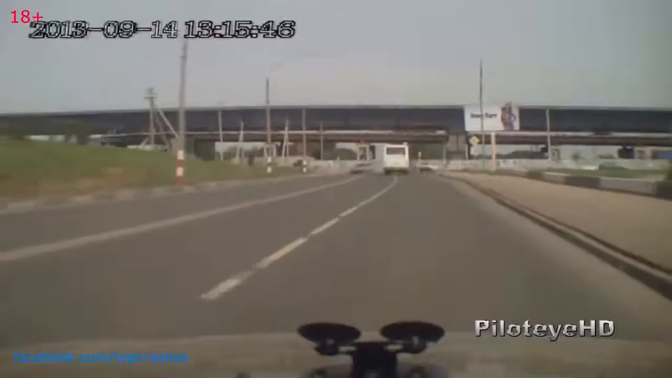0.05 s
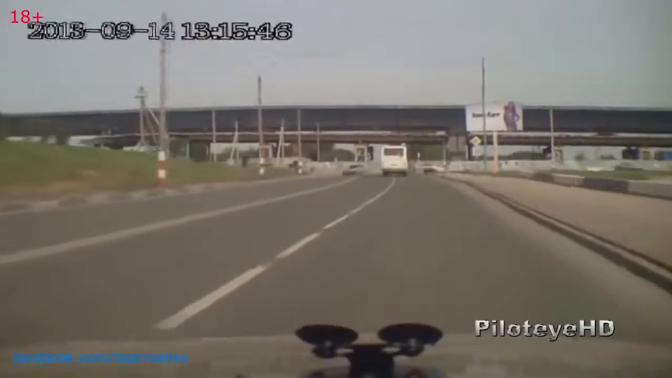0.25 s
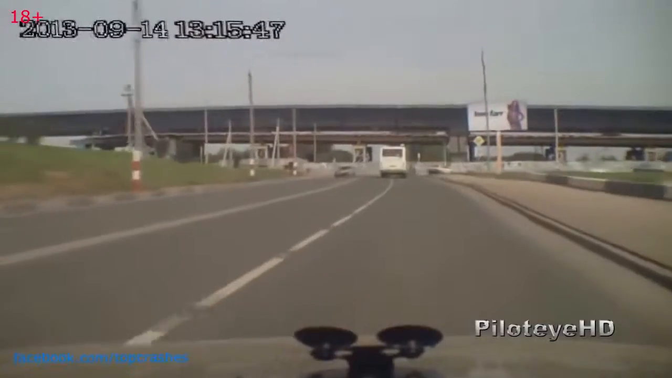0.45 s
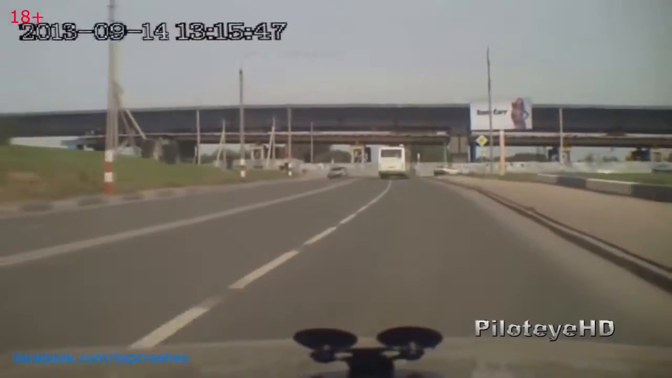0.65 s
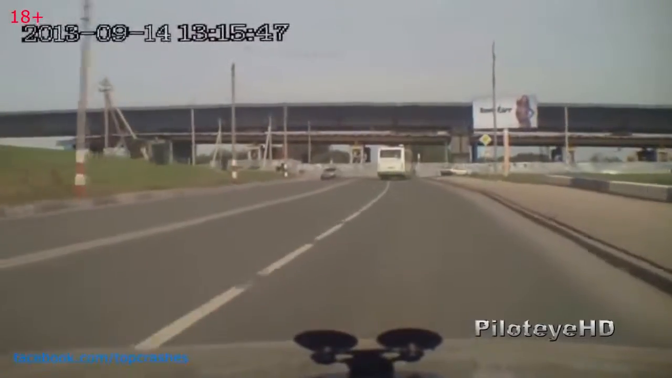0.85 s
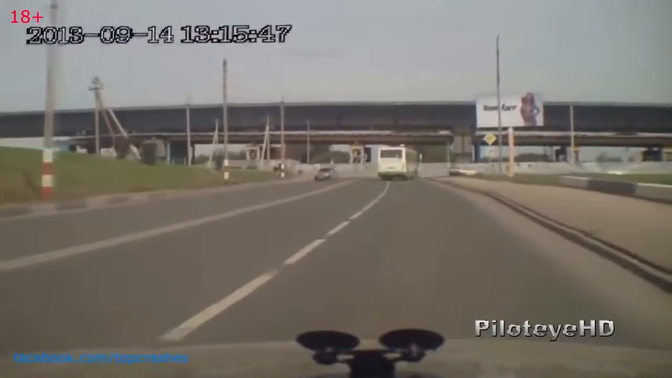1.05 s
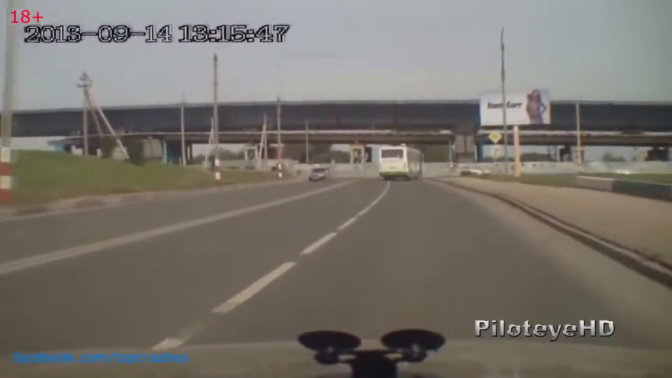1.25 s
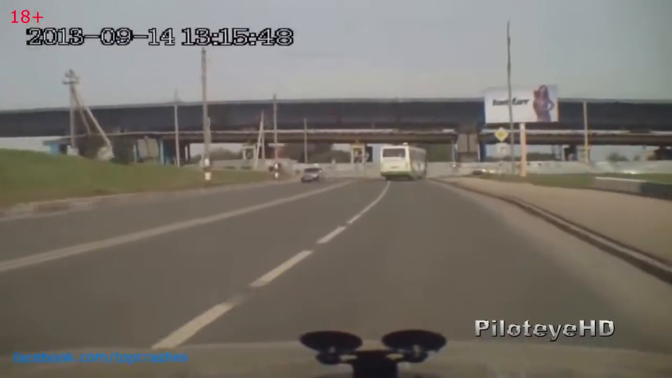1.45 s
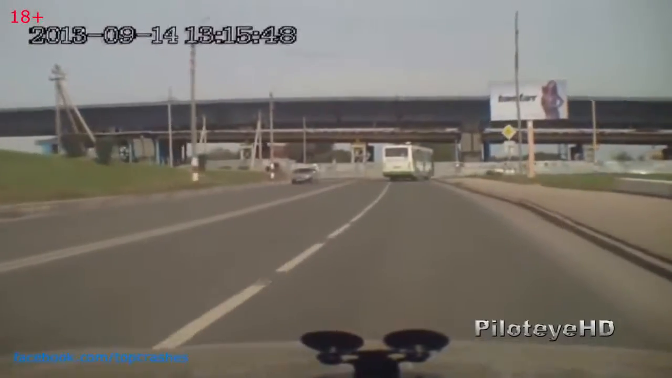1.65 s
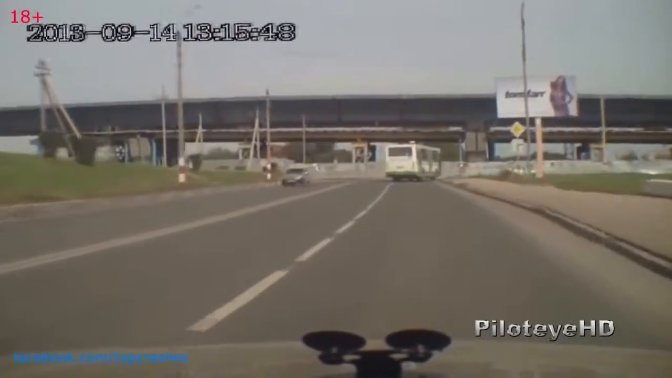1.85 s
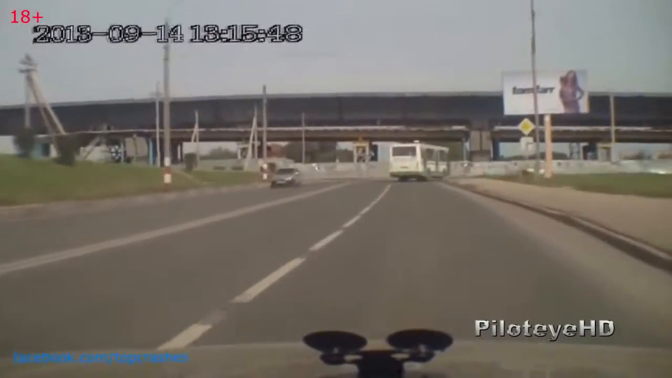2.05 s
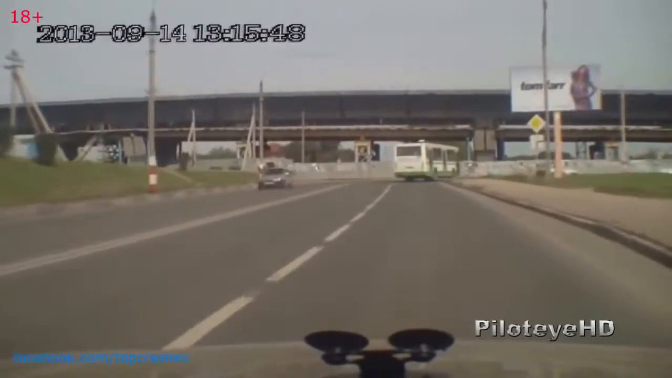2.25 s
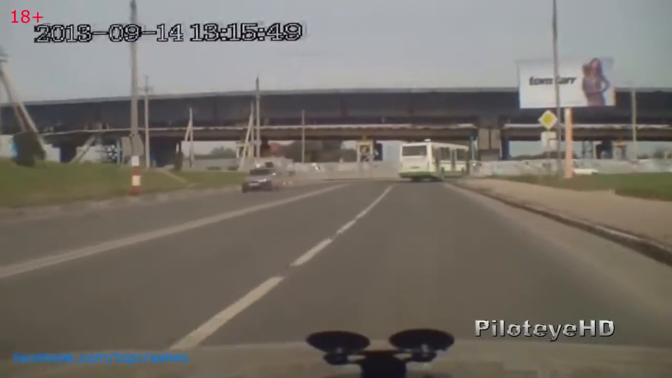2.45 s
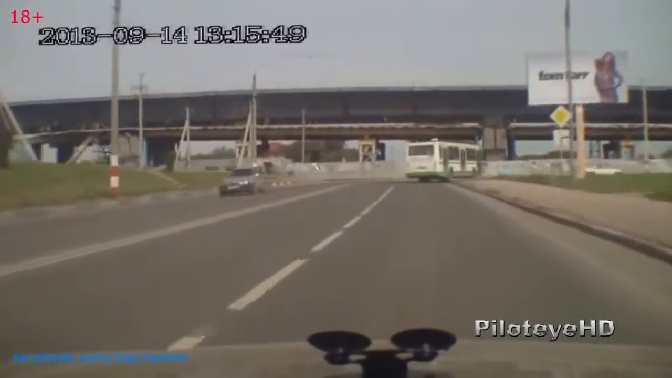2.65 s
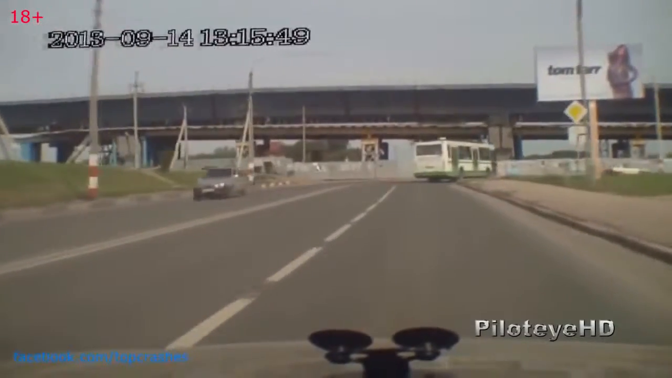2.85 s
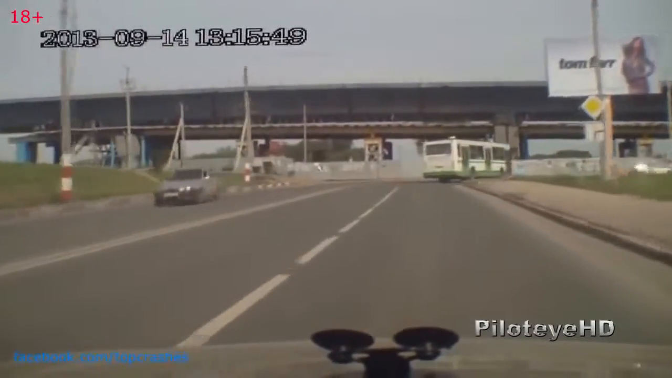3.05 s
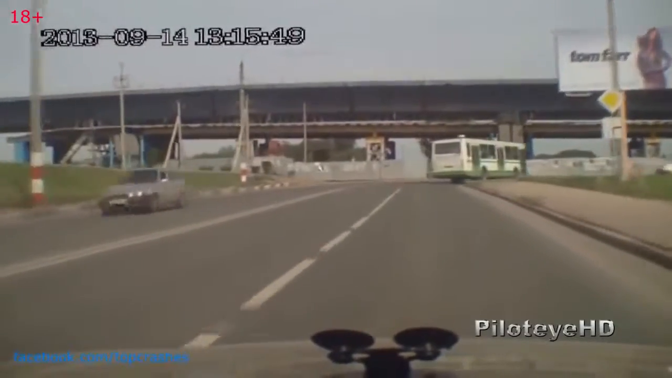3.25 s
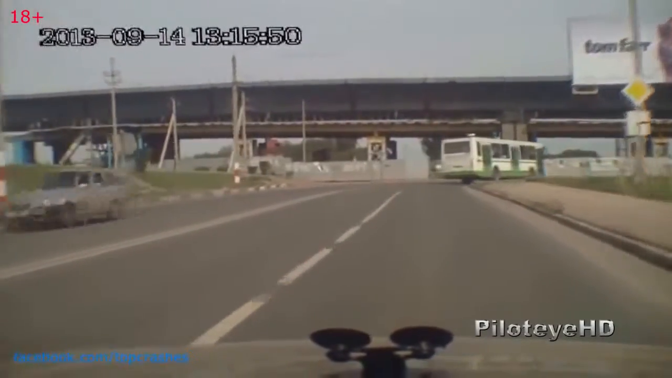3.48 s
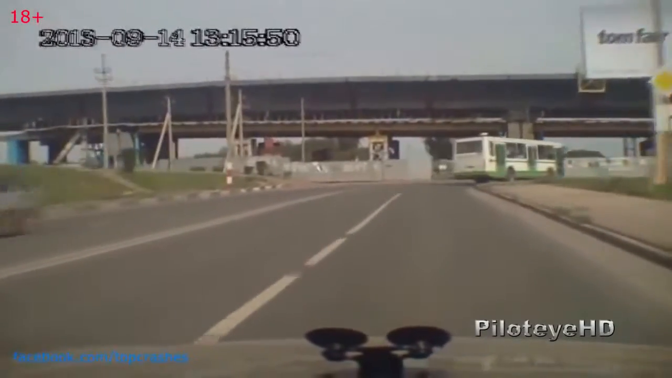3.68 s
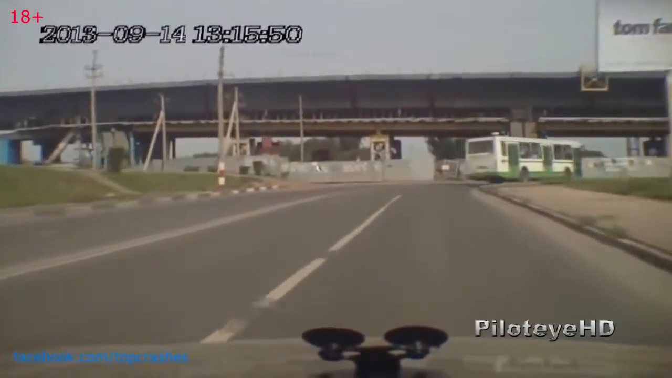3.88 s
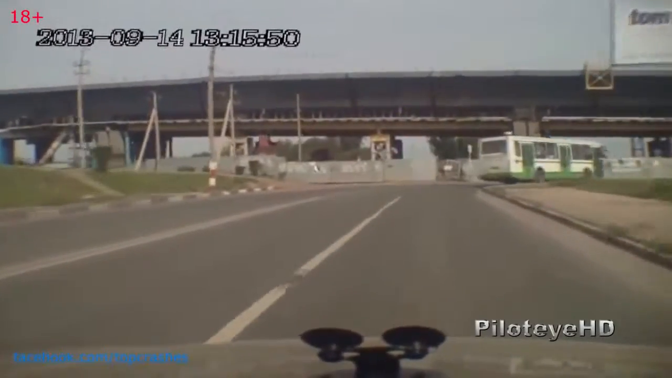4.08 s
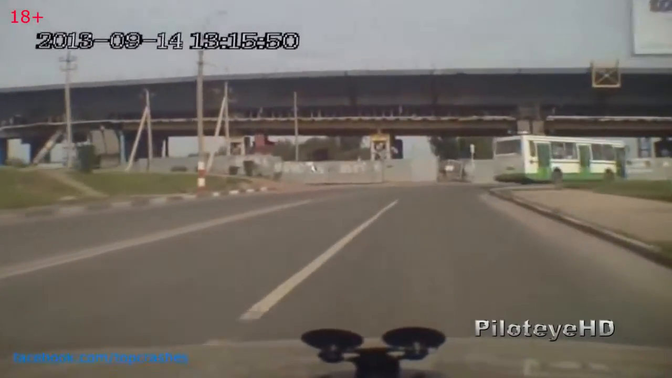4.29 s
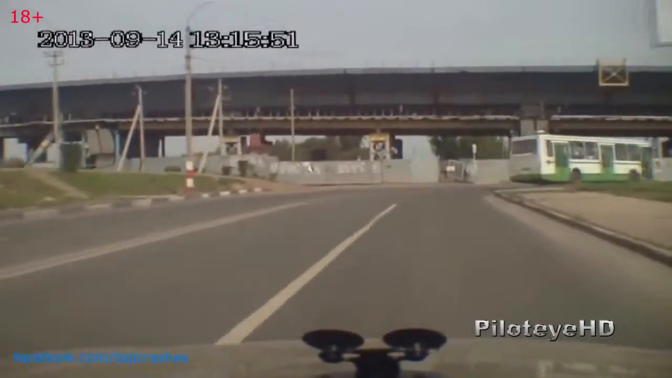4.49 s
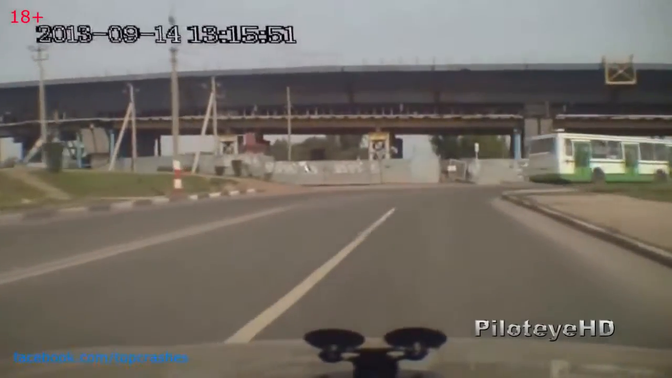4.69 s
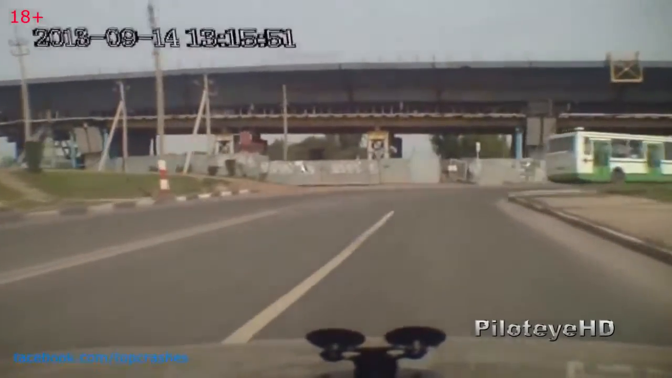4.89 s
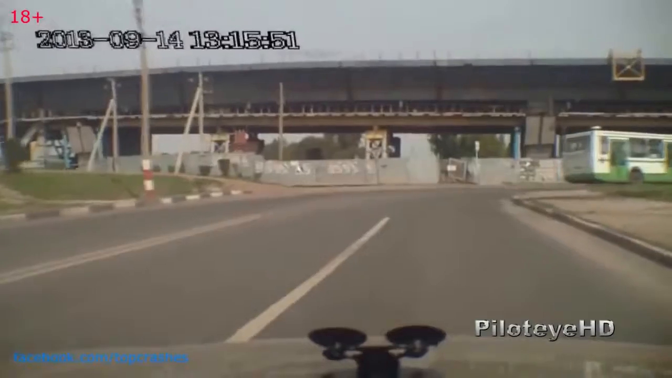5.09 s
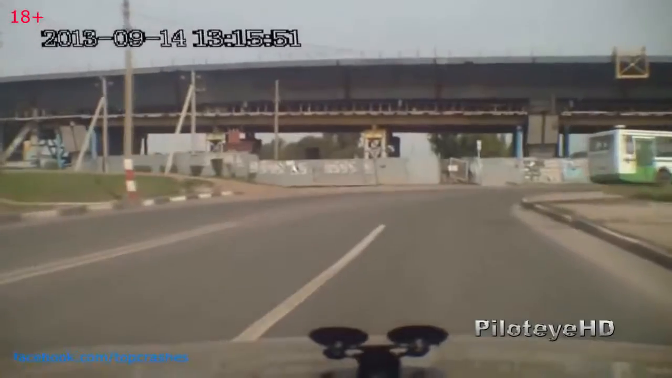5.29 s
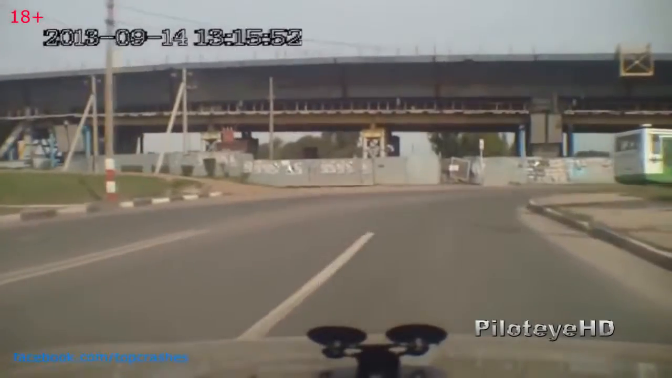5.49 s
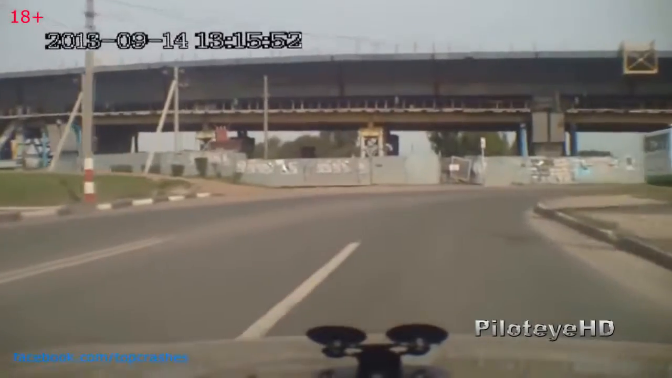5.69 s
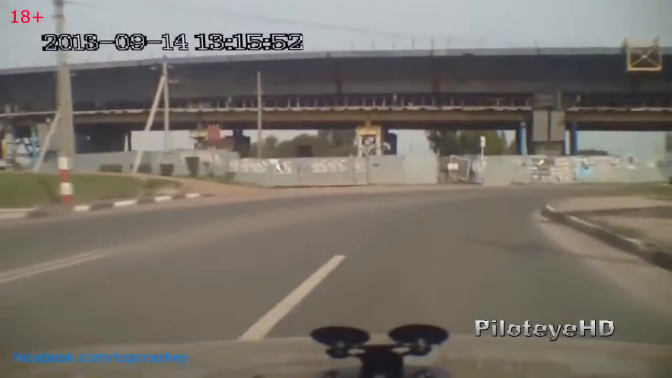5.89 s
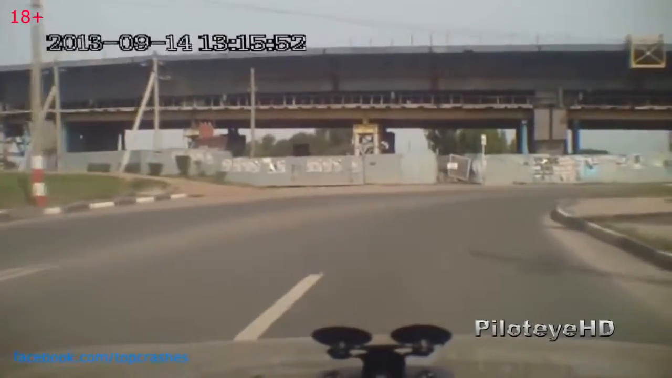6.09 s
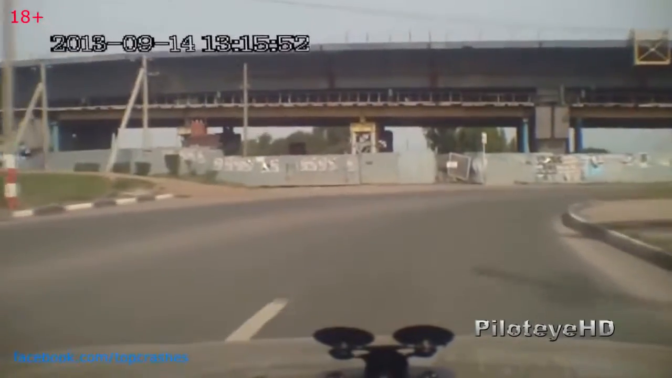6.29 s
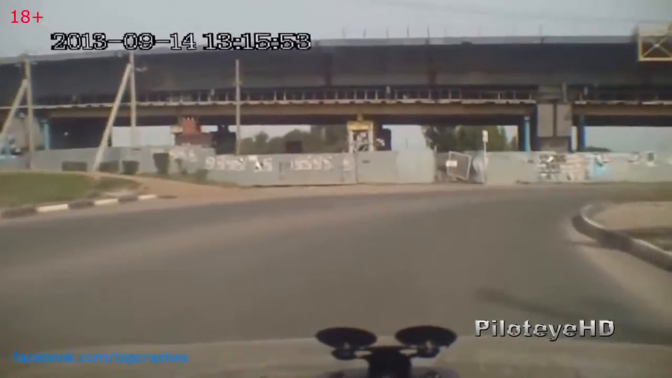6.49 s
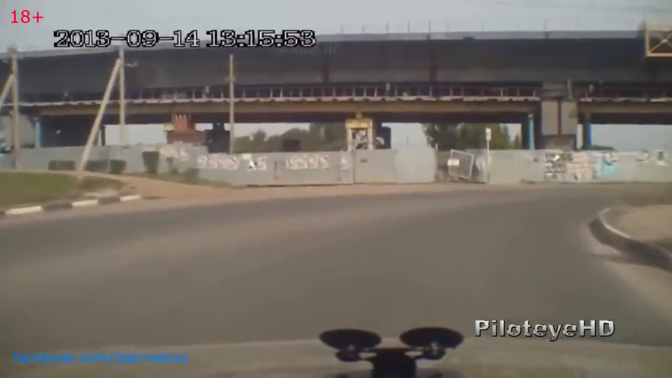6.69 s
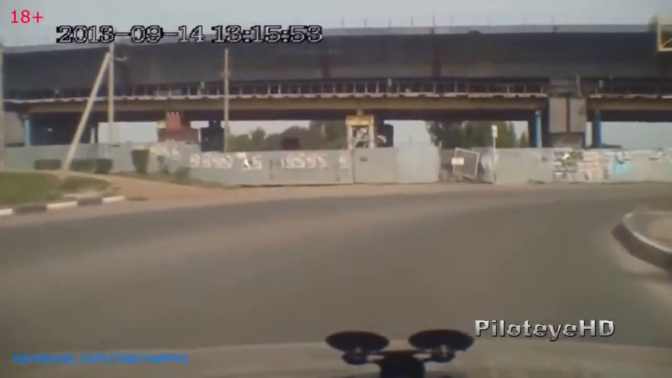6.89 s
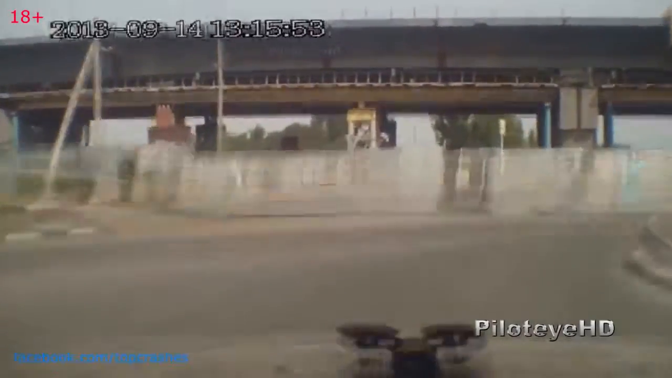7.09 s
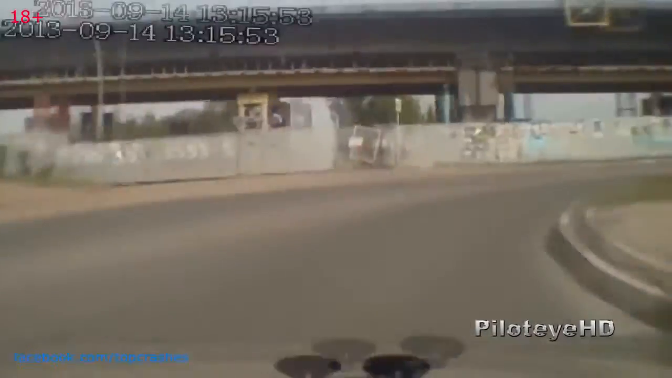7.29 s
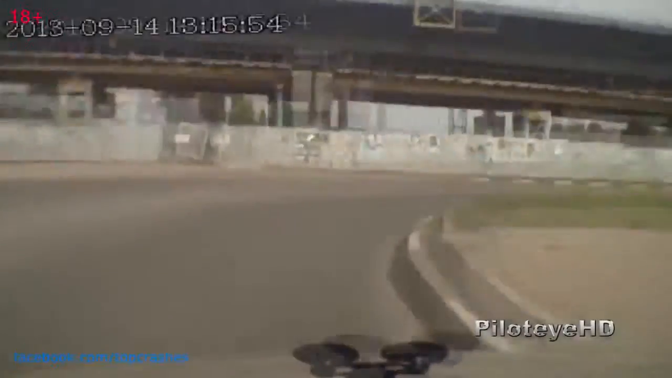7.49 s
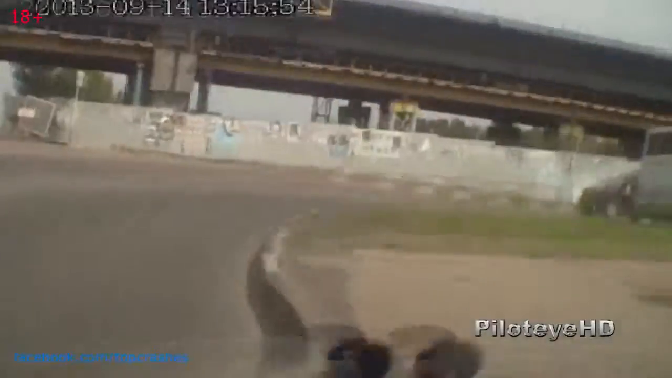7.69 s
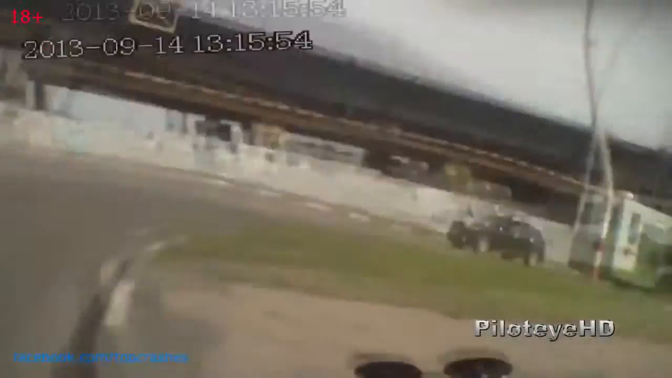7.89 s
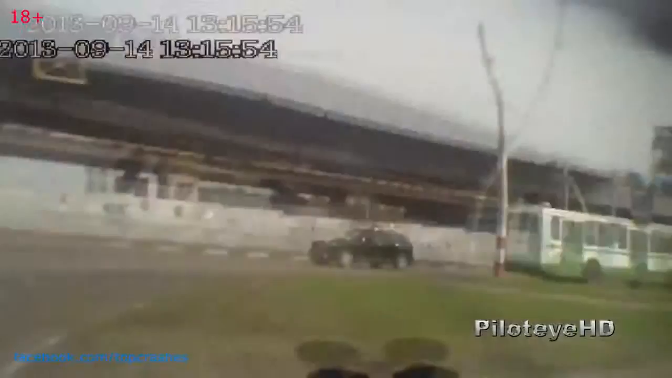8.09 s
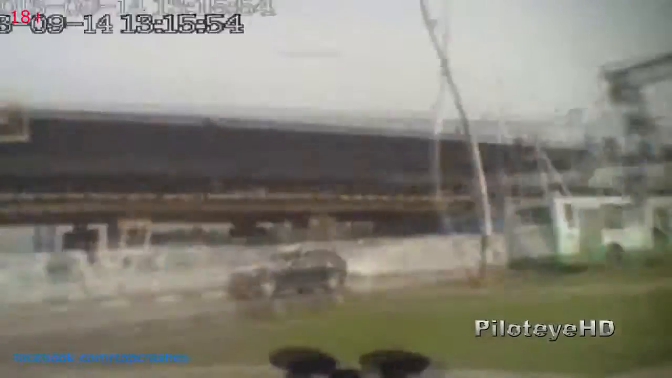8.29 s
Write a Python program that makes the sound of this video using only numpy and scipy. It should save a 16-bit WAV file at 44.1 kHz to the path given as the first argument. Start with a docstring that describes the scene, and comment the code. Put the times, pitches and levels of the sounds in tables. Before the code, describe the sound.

A small camera inside a car hears the cabin, almost wholly in the right channel, with a faint electronic whine. From 0 s there is low rumble, muffled tyre roar, tread hum and engine boom, swelling slightly on rough patches near 0.6, 1.2 and 3 s. Sharp trim ticks scatter over the first three seconds; harder dashboard clicks come around 1.8, 2.4, 3.0 and 4.6 s. A rapid buzzing rattle runs from about 3.2 to 5 s. The engine pitch sinks, and from 4.7 s braking adds a narrow hum and low drone. It is calmer until 6.6 s, when tyre hiss rises, with short hoarse squeals from 6.8 s. At 7.25 s a violent blow hits: overloaded booms, crunching scrapes, gritty fragments and dense plastic clatter, heaviest around 7.5-7.6, 7.9 and 8.0-8.3 s, with high metallic pings and more brief squeals to the end.

```python
"""Inside a slowing car, heard by a small camera on the windscreen: filtered-noise rumble, roar and tread hum.
Engine harmonics boom and trim ticks; dashboard clicks are decaying modes, a tiny hard piece chinks.
Braking adds a narrow-band hum; in a bend the tyres slide and squeal as wavering stick-slip harmonics.
The car is struck and jolts over a kerb onto grass: damped booms, noise scrapes and plastic clatter.
A small metal piece rings in decaying sines; loud peaks overload the microphone."""
import sys
import numpy as np
from scipy import signal
from scipy.fft import rfft, irfft, next_fast_len
from scipy.io import wavfile
from scipy.ndimage import map_coordinates

SR = 44100
rng = np.random.default_rng(int(sys.argv[2]) if len(sys.argv) > 2 else 0)


def waveform_to_disk(signal):
    """Save audio, clipped to [-1, 1], as 16-bit WAV at the path in sys.argv[1]."""
    frames = np.transpose(np.atleast_2d(signal))
    scaled = np.clip(frames, -1, 1) * 32767
    samples = np.round(scaled).astype(np.int16)
    wavfile.write(sys.argv[1], SR, samples)


N = 367922

# trim tick spectrum: freq_hz, density_db (relative, per Hz)
TICK_SPECTRUM = [(500, -45.5), (1800, -0.5), (2500, 13), (3300, 0), (4100, 7), (5600, -6.5), (6500, -1.5),
                 (7600, -3), (8800, -7.5), (9900, -5), (11000, -21.5), (15000, -19)]
# spectrum of the crack of struck parts: freq_hz, density_db (relative, per Hz)
CRACK_SPECTRUM = [(150, 2), (700, 7.5), (1500, 2), (2800, 11), (4000, -3.5), (5500, -6.5), (9800, -7.5),
                  (11500, -28.5), (16000, -3)]
# body shake spectrum: freq_hz, density_db (relative, per Hz)
SHAKE_SPECTRUM = [(15, 5), (30, 3), (50, 6), (85, -1), (145, 0.5), (200, -8), (400, -13.5), (750, -16.5),
                  (1500, -39), (4000, -71)]


def amp(db):
    """Decibels to gain."""
    return 10 ** (np.asarray(db) / 20)


def unit(x):
    """Scale to rms 1."""
    return x / np.sqrt(np.mean(x ** 2) + 1e-20)


def clock():
    """The time of every sample, in seconds."""
    return np.arange(N) / SR


def curves(rows):
    """One value per sample for each column after the time."""
    s, *cols = np.transpose(rows)
    return [np.interp(clock(), s, c) for c in cols]


def gains(points, size):
    """Gain of (Hz, dB) points on an FFT grid."""
    hz, db = np.transpose(points)
    grid_hz = np.fft.rfftfreq(size, 1 / SR)
    return amp(np.interp(np.log(grid_hz + 1), np.log(hz), db))


def noise(points, size=N):
    """Coloured noise of rms 1."""
    m = next_fast_len(size)
    spectrum = rfft(rng.standard_normal(m)) * gains(points, m)
    return unit(irfft(spectrum, m)[:size])


def wobble(rate):
    """A smooth random curve, rate knots a second."""
    knots = rng.standard_normal(int(N * rate / SR) + 4)
    return map_coordinates(knots, [clock() * rate])


def snap(points, size=1024):
    """Minimum-phase click with this spectrum, peak 1."""
    cepstrum = irfft(np.log(gains(points, size)))
    cepstrum[1:size // 2] *= 2
    cepstrum[size // 2 + 1:] = 0
    click = irfft(np.exp(rfft(cepstrum)))
    return click / np.abs(click).max()


def turns(hz):
    """Cycles run through at a changing rate."""
    return np.cumsum(hz) / SR


def add(track, s, sound):
    """Mix a sound in at time s."""
    part = track[round(s * SR):][:len(sound)]
    part += sound[:len(part)]


def ramp(start, rise):
    """From 0 to 1 in rise seconds."""
    return np.clip((clock() - start) / rise, 0, 1)


def swell(start, length, attack, t60):
    """Attack, hold until the length is up, then die away."""
    return ramp(start, attack) * amp(-60 * np.clip((clock() - start - length) / t60, 0, 2))


def band(hz, width_hz):
    """Narrow noise of rms 1 around a moving pitch."""
    phase = 2 * np.pi * turns(hz)
    return unit(wobble(width_hz) * np.cos(phase) + wobble(width_hz) * np.sin(phase))


def road():
    """Rumble through the body, tyre roar through the glass and the hum of the tread all follow the speed."""
    # road speed: time_s, share of the reference speed [ratio]
    speed_curve = [(0, 0.96), (2, 0.88), (4.9, 0.7), (6.2, 0.65), (6.7, .55), (7.25, 0.54)]
    # rough stretches of asphalt: start_s, length_s, extra_rumble_db
    patches = [(.55, 0.46, 1.5), (1.195, 0.87, 2), (2.994, 1, 2.5)]
    # body rumble spectrum: freq_hz, density_db (relative, per Hz)
    rumble_spectrum = [(12, -18), (25, 2), (38, 2.5), (65, -5.5), (100, -8), (140, -7), (165, -8.5),
                       (200, -18.5), (330, -15.5), (500, -23.5), (1000, -70.5)]
    # tyre roar spectrum: freq_hz, density_db (relative, per Hz)
    roar_spectrum = [(100, -8), (300, -1.5), (600, 3), (850, 1.5), (1250, 2), (2000, -2.5), (2550, -8),
                     (3000, -11), (3700, -23.5), (5000, -34.5), (9500, -33.5), (12000, -54)]
    # levels and pitches at the reference speed; slopes per doubling of speed
    rumble_db, rumble_db_per_octave = -38.5, 8.5
    roar_db, roar_db_per_octave = -48, 4
    tread_hz, tread_db, tread_db_per_octave = 690, -49.5, 15.5
    hum_hz, hum_db = 548, -53
    # fixed pitches
    drone_hz, drone_db, drone_rise_s = 266, -56, 0.8
    hiss_hz, hiss_db = 2440, -60.5
    brake_s, brake_rise_s, brake_ease_db = 4.67, 0.53, 2
    bend_s, bend_rise_s, bend_roar_db, bend_hiss_db = 6.64, 0.3, 3, 11.5

    speed, = curves(speed_curve)
    octaves = np.log2(speed)
    braking = ramp(brake_s, brake_rise_s)
    sliding = ramp(bend_s, bend_rise_s)
    patch_db = sum(db * swell(s, length, attack=0.06, t60=1) for s, length, db in patches)
    rumble_now_db = rumble_db + rumble_db_per_octave * octaves + patch_db + 0.46 * wobble(7.3)
    rumble = amp(rumble_now_db) * noise(rumble_spectrum)
    roar_now_db = roar_db + roar_db_per_octave * octaves
    roar_now_db += bend_roar_db * sliding - brake_ease_db * braking
    roar = amp(roar_now_db + 0.8 * wobble(14)) * noise(roar_spectrum)
    # braking fades the broad tread hum into a narrower, lower one
    tread = amp(tread_db + tread_db_per_octave * octaves) * band(tread_hz * speed, width_hz=170)
    hum = amp(hum_db) * band(hum_hz * speed, width_hz=65)
    drone = amp(drone_db) * ramp(brake_s, drone_rise_s) * band(np.full(N, drone_hz), width_hz=28)
    hiss = amp(hiss_db + bend_hiss_db * sliding) * band(np.full(N, hiss_hz), width_hz=500)
    return rumble + roar + (1 - braking) * tread + braking * (hum + drone + hiss)


def ticking(hits, spectrum):
    """Each contact gives a sharp tick and a brief noisy ring that is never twice the same."""
    ring_db, ring_t60_s = -19.5, 0.015
    fade = amp(ring_db - 60 * np.arange(SR // 20) / SR / ring_t60_s)
    ticks = signal.oaconvolve(hits, snap(spectrum))[:N]
    ring = signal.oaconvolve(hits, fade)[:N] * noise(spectrum)
    return ticks + ring


def engine():
    """The firing booms in the cabin and, in spells, throws loose trim against its stops once a cycle."""
    # engine slowing: time_s, firing_hz
    firing_curve = [(0, 66.4), (3.35, 60.02), (4.15, 55.32), (4.95, 51.85), (5.75, 42.97), (6.2, 33.6)]
    # spells of steady ticking: start_s, length_s, level_db, unevenness_db
    rattles = [(0.262, 0.067, -32.5, 4), (0.885, 0.12, -34.5, 3), (1.51, 0.094, -32.5, -4),
               (3.191, 0.24, -34, -3.5), (3.469, 1.484, -30, 2.5), (5.412, .14, -37, 7),
               (5.65, 0.085, -37, 6)]
    # chattering panel spectrum: freq_hz, density_db (relative, per Hz)
    panel_spectrum = [(300, -19), (1500, -1.5), (2000, -1), (2400, 6), (3000, -6), (4200, -10), (5600, -27),
                      (9800, -26), (12000, -29), (16000, -60)]
    # the firing rate falls through the cabin resonance
    boom_base_db, cabin_hz, cabin_width_hz, cabin_db = -52.5, 44.7, 5.5, 9.5
    scatter_s, swell_db = 0.0013, 3
    tail_s, tail_db = 0.12, -25  # each spell trails off in weak ticks
    # a panel joins the longest spell
    buzz_s, buzz_length_s, buzz_rise_s, buzz_t60_s, buzz_db = 3.2, 1.624, 1.18, 0.61, -36.5

    firing_hz, = curves(firing_curve)
    boom_db = boom_base_db + cabin_db / (1 + ((firing_hz - cabin_hz) / cabin_width_hz) ** 2)
    cycle = turns(firing_hz * (1 + 0.0049 * wobble(9)))
    boom = np.zeros(N)
    for k, harmonic_db in enumerate([0, -1, -12], 1):
        boom += amp(harmonic_db + 2.3 * wobble(8.8)) * np.sin(2 * np.pi * k * cycle)

    ticks, panel = np.zeros(N), np.zeros(N)
    for i in np.flatnonzero(np.diff(np.floor(cycle))):
        force, buzz, delay = np.minimum(rng.standard_normal(3), 1.5)
        rebounds = rng.random((4, 2))
        period_s = 1 / firing_hz[i]
        s = abs(i / SR + delay * scatter_s)
        for start, length, db, uneven_db in rattles:
            if start <= s < start + length + tail_s:
                # strongest in the middle of the spell
                arch = np.sin(np.pi * min((s - start) / length, 1))
                peak_db = db + swell_db * (arch - 1) + tail_db * (s > start + length)
                add(ticks, s, amp([peak_db + uneven_db * force]))
                # weaker rebounds within the cycle
                for moment, rebound in rebounds:
                    add(ticks, s + period_s * moment, amp([peak_db - 25 + 22 * rebound]))
        # the panel lands later in the cycle and chatters briefly
        for wait_s in rng.uniform(0, 0.0018, size=3):
            add(panel, s + 0.57 * period_s + wait_s, amp([buzz_db + 3 * buzz]))
    panel *= swell(buzz_s, buzz_length_s, buzz_rise_s, buzz_t60_s)
    return amp(boom_db) * unit(boom) + ticking(ticks, TICK_SPECTRUM) + ticking(panel, panel_spectrum)


def strays():
    """At speed the trim rocks and ticks in small clusters, with some sharp single ticks and a faint crackle."""
    # sharpest single ticks of the trim: time_s, level_db
    sharp_ticks = [(0.109, -36.5), (0.168, -33.5), (0.338, -27), (0.677, -35.5), (0.724, -38),
                   (0.794, -32.5), (0.837, -30.5), (0.905, -27.5), (0.961, -27), (1.321, -30.5),
                   (1.426, -28), (1.598, -26.5), (1.886, -29), (2.247, -30), (2.548, -29), (2.674, -28),
                   (2.744, -27.5), (2.989, -31), (5.01, -41), (5.38, -43.5), (5.487, -29), (5.62, -40),
                   (5.863, -42)]
    rock_per_s, rock_end_s, rock_db, spread_s = 17, 3.2, -42.5, 0.007
    hits = np.zeros(N)
    for s, db in sharp_ticks:
        add(hits, s, amp([db]))
    for k, cluster in enumerate(rng.standard_normal((64, 3, 2)), 2):
        s = k / rock_per_s
        lurch_db = rng.uniform(-3, 5.1)
        for shift, force in cluster:
            tick = amp([rock_db + lurch_db + 2.3 * min(force, 1.8)])
            add(hits, s + spread_s * shift, (s < rock_end_s) * tick)
    # faint, sparse crackle over the first 6.6 s
    for moment, force in rng.random((110, 2)):
        add(hits, 6.6 * moment, amp([-60 + 16 * force ** 2]))
    return ticking(hits, TICK_SPECTRUM)


def knock(ring_hz, ring_db, crack, crack_db, crack_t60, ring_t60):
    """Plastic on plastic, peak 1: a crack, the shared modes and the struck part's own ring."""
    # shared plastic modes: freq_hz, level_db (relative), t60_s
    shared_modes = [(1670, 0.5, 0.011), (2250, -1.5, 0.014), (2850, -9.5, 0.016)]
    t = np.arange(SR // 10) / SR
    ring = np.zeros(len(t))
    for hz, db, t60 in [*shared_modes, (ring_hz, ring_db, ring_t60)]:
        cycles = hz * rng.normal(1, 0.025) * t + rng.random()
        ring += amp(db + rng.normal(0, 2) - 60 * t / t60) * np.sin(2 * np.pi * cycles)
    crack_noise = amp(crack_db - 60 * t / crack_t60) * noise(crack, size=len(t))
    blow = (ring + crack_noise) * (1 - np.exp(-t / 0.00026))
    return blow / np.abs(blow).max()


def clicks():
    """The dashboard clicks over small bumps; the struck part rings briefly."""
    # dashboard clicks: time_s, level_db, ring_hz, ring_db (relative)
    bumps = [(1.794, -16.5, 2270, 2.5), (1.854, -31.5, 2220, 13), (2.3834, -22, 2200, 6),
             (2.3876, -13.5, 2930, 13.5), (2.4427, -23.5, 2220, 5.5), (2.8962, -16.5, 1290, -4),
             (2.935, -19.5, 2250, 8.5), (3.0104, -10.5, 2930, 8.5), (3.0687, -25.5, 2180, 5),
             (3.453, -25.5, 2460, 0), (4.594, -20.5, 2870, 12.5), (4.633, -24.5, 2880, 13)]
    # spectrum of a click's crack: freq_hz, density_db (relative, per Hz)
    clack_spectrum = [(250, -20), (750, 0), (2400, 4.5), (5000, -13), (10000, -24), (16000, -77)]
    out = np.zeros(N)
    for s, db, ring_hz, ring_db in bumps:
        blow = knock(ring_hz, ring_db, clack_spectrum, crack_db=3.0, crack_t60=0.011, ring_t60=0.012)
        add(out, s, amp(db) * blow)
    return out


def chinks():
    """A tiny hard piece touches something and gives one very short, high ring."""
    # contacts of the tiny piece: time_s, level_db
    contacts = [(5.122, -42), (6.736, -41)]
    ring_hz, t60_s = 8130, 0.0054
    out, t = np.zeros(N), np.arange(SR // 20) / SR
    for s, db in contacts:
        add(out, s, amp(db - 60 * t / t60_s) * np.sin(2 * np.pi * ring_hz * t))
    return out


def squeals(overtone_db, overtone_fall_db):
    """Rubber sticks and slips at a wavering pitch; many tread blocks out of step make it hoarse."""
    # tyre squeals: start_s, length_s, pitch_hz, glide_hz_per_s, level_db, roughness [0-1]
    slides = [(6.817, 0.028, 2307, 2500, -34, 0.7), (6.851, 0.72, 2321, -100, -44.5, 0.9),
              (6.905, 0.065, 2295, -1800, -38.5, 0.4), (6.963, 0.053, 2305, -1000, -30.5, 0.34),
              (7.098, 0.064, 2177, 1200, -34, 0.5), (7.179, 0.055, 2297, -600, -32, 0.25),
              (7.706, 0.052, 2160, 3000, -34, .4), (7.772, 0.047, 1280, 2797, -31.5, 0.3),
              (7.822, .065, 1425, -2000, -40.5, 0.3), (8.233, 0.06, 1280, 2400, -37, 0.3),
              (8.287, 0.045, 1420, -1500, -37, 0.3)]
    # sliding rubber hiss spectrum: freq_hz, density_db (relative, per Hz)
    scrub_spectrum = [(1500, -6.5), (2500, 12.5), (3300, -13.5), (5600, -24), (7000, -20), (9800, -32),
                      (11000, -45)]
    attack_s, t60_s = 0.0094, 0.068
    full_db = -30  # below this level the overtones fall away faster than the squeal
    scrub_db = -13.5  # relative to the squeal
    out = np.zeros(N)
    waver = 1 + 0.01086 * wobble(55)
    flutter = amp(1.7 * wobble(90))
    hoarse = wobble(370) + 1j * wobble(370)
    smear = wobble(420) + 1j * wobble(420)
    scrub = amp(scrub_db) * noise(scrub_spectrum)
    for start, length, pitch_hz, glide, db, rough in slides:
        on = (clock() > start) & (clock() < start + length + t60_s)
        hz = (pitch_hz + glide * np.minimum(clock()[on] - start, length)) * waver[on]
        slip = np.exp(2j * np.pi * turns(hz))
        fundamental = slip * (flutter[on] + rough * hoarse[on])
        overtones = sum(amp(overtone_db - overtone_fall_db * (k - 2.0)) * slip ** k for k in range(2, 5))
        overtones = amp(db - full_db) * overtones * (flutter[on] + 2 * rough * smear[on])
        tone = unit(np.real(fundamental + overtones))
        out[on] += amp(db) * (tone + scrub[on]) * swell(start, length, attack_s, t60_s)[on]
    return out


def crunches():
    """The underbody catches and breaks free at random: sudden bursts of noise that die fast, rms 1."""
    # scraping spectrum: freq_hz, density_db (relative, per Hz)
    scrape_spectrum = [(100, 1), (500, 4), (1000, -0.5), (1800, 1), (2600, 3.5), (3500, -8), (5000, -18.5),
                       (9500, -15), (11500, -28), (16000, -29)]
    crunch_per_s, t60_s, spread_db = 120, 0.021, 11
    slide_db = -10  # steady slide under the bursts
    force, t = np.full(N, amp(slide_db)), np.arange(SR // 50) / SR
    for moment, size in rng.random((int(crunch_per_s * N / SR), 2)):
        add(force, moment * N / SR, amp(spread_db * (size - 0.5) - 60 * t / t60_s))
    return unit(force * noise(scrape_spectrum))


def grit():
    """Small fragments crunch: sharp grains at random moments, most of them weak, each with its own pitch."""
    # pitch spreads an octave either way; levels relative to the crunches
    grains_per_s, weakest_db, spread_db, middle_hz = 220, 0, 14, 3630
    out, t = np.zeros(N), np.arange(SR // 200) / SR
    for moment, size, pitch in rng.random((int(grains_per_s * N / SR), 3)):
        cycles = middle_hz * 2 ** (2 * pitch - 1) * t
        grain = np.sin(2 * np.pi * cycles) * np.exp(-cycles / 0.85)
        add(out, moment * N / SR, amp(weakest_db + spread_db * size ** 3) * grain)
    return out


def thumps():
    """Each blow sets the body swinging: a damped low tone with shaking noise."""
    # heavy blows to the body: time_s, level_db, pitch_hz, t60_s
    blows = [(7.259, -5, 142.6, 0.23), (7.377, -16.5, 58.8, 0.44), (7.517, -6, 61, 0.12),
             (7.596, 7, 426, 0.018), (7.89, 0.5, 118, 0.047), (8.141, -1.5, 145, 0.14),
             (8.161, -8.5, 113.5, 0.16), (8.251, -7.5, 45, 0.089)]
    out, t = np.zeros(N), np.arange(SR // 2) / SR
    for s, db, hz, t60 in blows:
        swing = np.sin(2 * np.pi * hz * t) + noise(SHAKE_SPECTRUM, size=len(t)) / 2
        add(out, s, amp(db - 60 * t / t60) * swing * (1 - np.exp(-t / 0.0015)))
    return out


def clatter():
    """Every thrown piece of plastic cracks and rings, never twice at the same pitch."""
    # loose plastic strikes: time_s, level_db, ring_db (relative)
    strikes = [(7.283, -10.5, -8), (7.299, -11, -3), (7.367, -12, -14), (7.393, -11.5, -6),
               (7.419, -13, -8), (7.446, -9.5, -10), (7.474, 3.5, -5), (7.483, -3, 4), (7.541, -10, -5),
               (7.553, -9.5, -15), (7.570, -6.5, -3), (7.616, -14, -2), (7.632, -6.5, -10),
               (7.659, -15.5, -6), (7.675, -16, 4), (7.744, -9, 10.5), (7.749, -11.5, 5), (7.756, -6, 6),
               (7.843, -6.5, 4), (7.916, -15, -3), (7.934, -9, -10), (7.944, -7.5, -7), (7.962, -14, -5),
               (7.975, -18, -9), (8.009, -0.5, -5), (8.028, -7.5, 4), (8.038, -1, 4), (8.052, -3.5, -10),
               (8.059, -6, -6), (8.072, -7.5, -8), (8.084, -12.5, -4), (8.101, -2, -8), (8.107, 1, 0),
               (8.119, -7, 16), (8.197, -16, -7), (8.209, -7, -8), (8.229, -8.5, -4), (8.310, 2, -3),
               (8.334, -12, -4)]
    out = np.zeros(N)
    for s, db, ring_db in strikes:
        blow = knock(2878, ring_db, CRACK_SPECTRUM, crack_db=8.5, crack_t60=0.018, ring_t60=0.027)
        add(out, s, amp(db) * blow)
    return out


def pings():
    """A small loose metal piece is thrown about and rings, a little differently each time."""
    # strikes of the metal piece: time_s, level_db
    strikes = [(7.475, -12.5), (7.844, -9.5), (8.312, -14.5)]
    # metal modes: freq_hz, level_db (relative), t60_s
    modes = [(9890, -2, 0.077), (11900, -26, 0.099), (14100, -11, 0.071)]
    out, t = np.zeros(N), np.arange(SR // 4) / SR
    for s, level_db in strikes:
        ring = np.zeros(len(t))
        for hz, db, t60 in modes:
            ring += amp(db - 60 * t / t60) * np.sin(2 * np.pi * hz * rng.normal(1, 0.00087) * t)
        crack = amp(-19.0 - 60 * t / 0.057) * noise(CRACK_SPECTRUM, size=len(t))
        add(out, s, amp(level_db) * ring + crack)
    return out


def crash():
    """At every jolt the body shakes and scrapes over rough ground while everything loose clatters."""
    # hits and landings: start_s, contact_s, shake_db, scrape_db
    jolts = [(7.254, 0.067, -14, -23.5), (7.32, 0.17, -24.5, -30), (7.516, 0.15, -23.5, -32),
             (7.679, 0.14, -31.5, -35), (7.791, 0.01, -18.5, -43), (7.886, 0.11, -17.5, -29),
             (8.039, 0.084, -26, -27.5), (8.134, 0.23, -22, -32.5)]
    heave_hz, heave_db = 28.3, -6.5  # whole body, relative to the shake
    shake = noise(SHAKE_SPECTRUM) + amp(heave_db) * band(np.full(N, heave_hz), width_hz=18)
    scrape = crunches() + grit()
    body = np.zeros(N)
    for s, length, shake_db, scrape_db in jolts:
        jolt = amp(shake_db) * shake + amp(scrape_db) * scrape
        body += swell(s, length, attack=0.028, t60=0.2) * jolt
    return body + thumps() + clatter() + pings()


def scene():
    """One microphone feeds the right channel; the left carries only a trace of it."""
    cabin = road() + engine() + strays() + clicks() + chinks()
    cabin += squeals(overtone_db=-30, overtone_fall_db=10) + crash()
    # source levels are ahead of these channel gains
    return np.array([amp(-61.5) * cabin, 2 * cabin])


def record(dry):
    """The camera starts, adds a faint electronic whine, flattens the loud peaks and limits the band."""
    full_level_s, rise_s, top_hz = 0.07, 0.0052, 15900
    live = np.clip((clock() - full_level_s) / rise_s + 1, amp(-63), 1)
    whine = amp([[-110], [-72]]) * np.sin(2 * np.pi * 7900 * clock())
    x = live * (dry + whine)
    ceiling = 0.41
    clipped = x / (1 + np.abs(x / ceiling) ** 8) ** (1 / 8)
    # a faint, bounded treble edge sounds on the flattened peaks
    excess_slope = np.diff(x - clipped, prepend=0)
    edged = clipped + amp(-36.5) * np.tanh(excess_slope / amp(-31))
    m = next_fast_len(N + SR // 2)
    rolloff = gains([(10200, 0.5), (11500, 2), (15000, -10.5), (16000, -22)], m)
    passband = np.fft.rfftfreq(m, 1 / SR) < top_hz
    return irfft(rfft(edged, m) * rolloff * passband, m)[:, :N]


dry = scene()
out = record(dry)
waveform_to_disk(out)
```